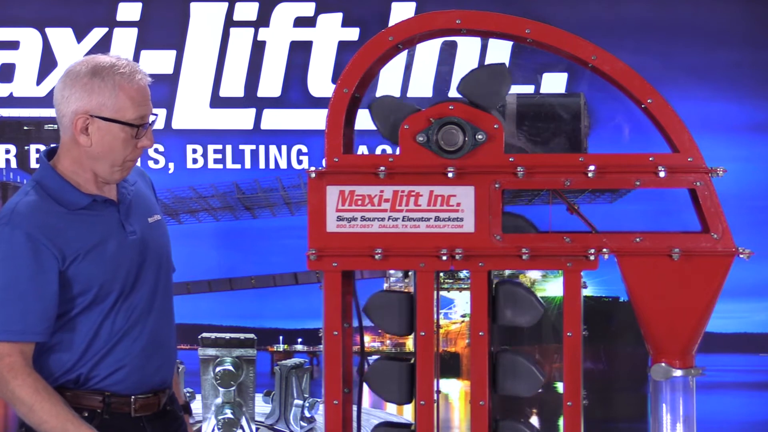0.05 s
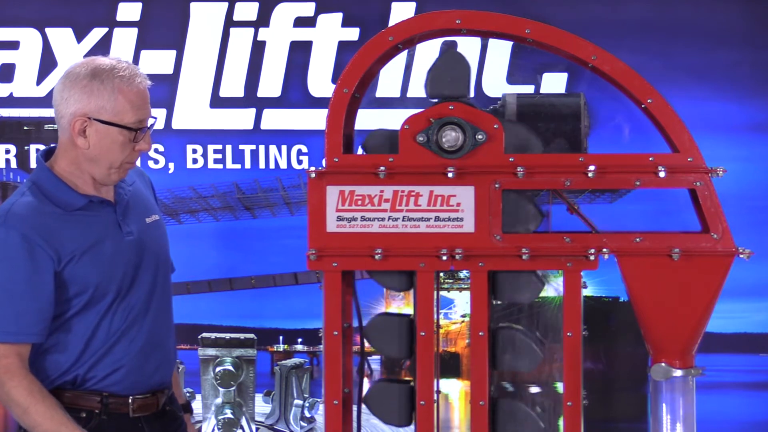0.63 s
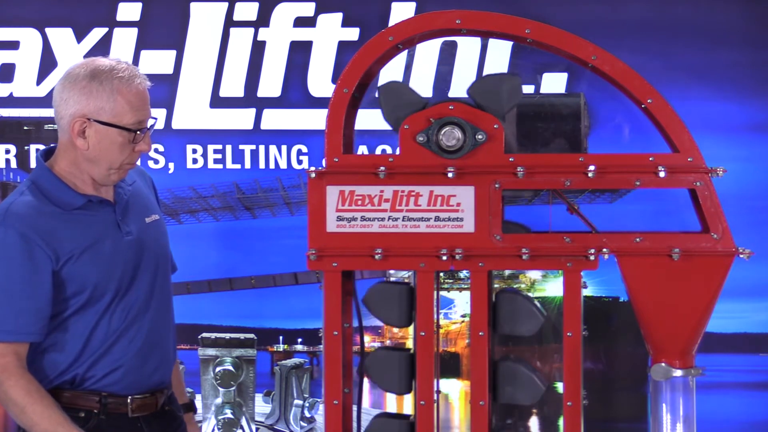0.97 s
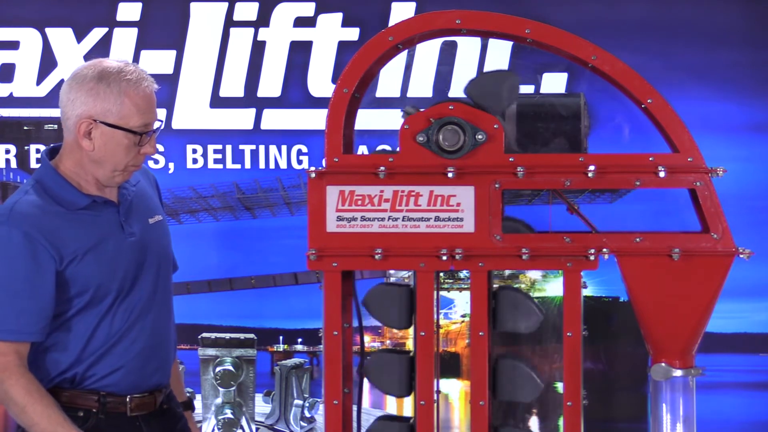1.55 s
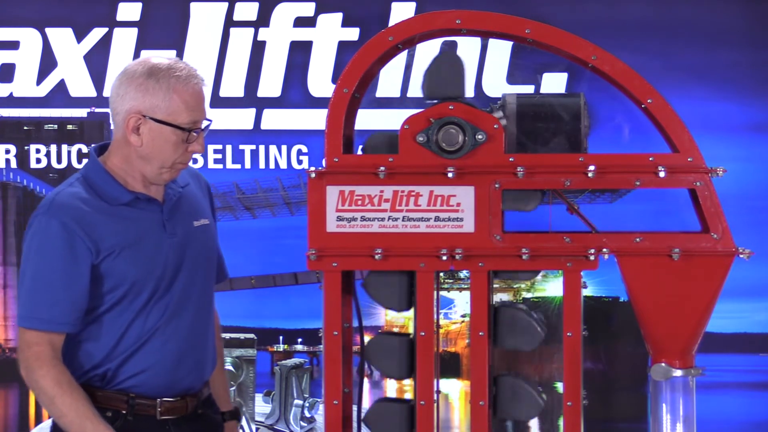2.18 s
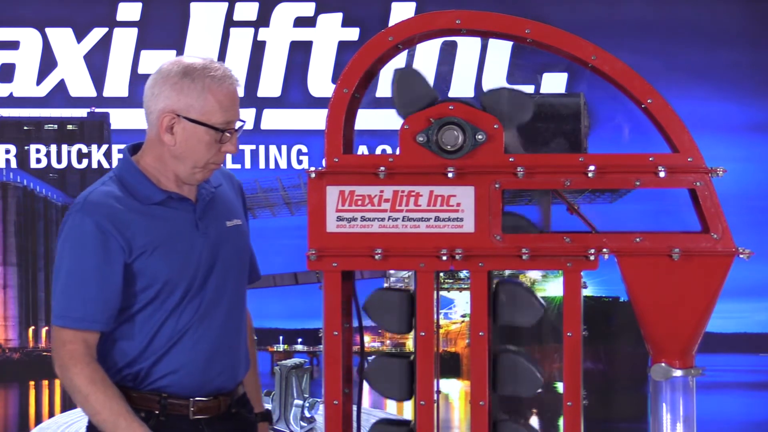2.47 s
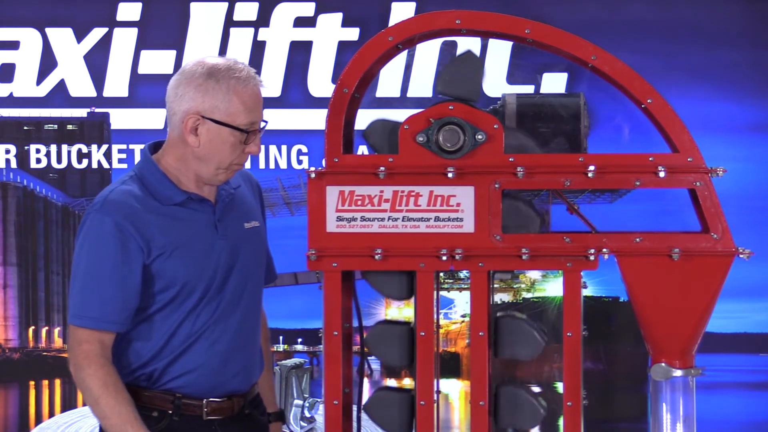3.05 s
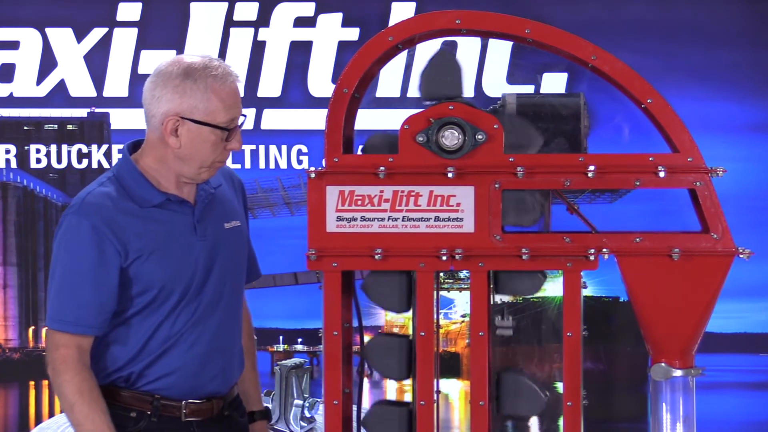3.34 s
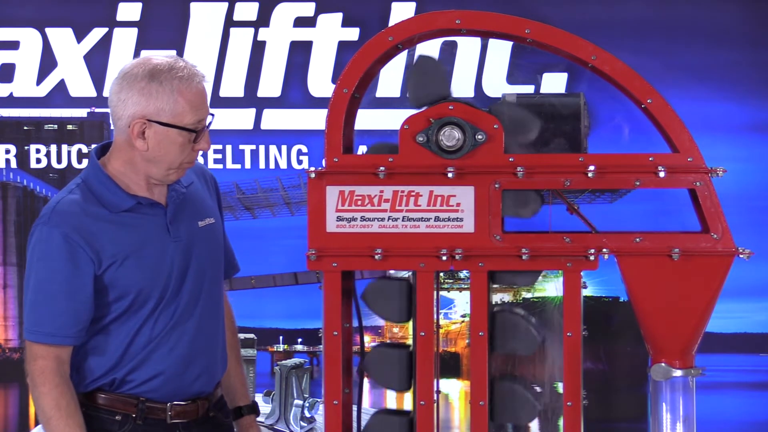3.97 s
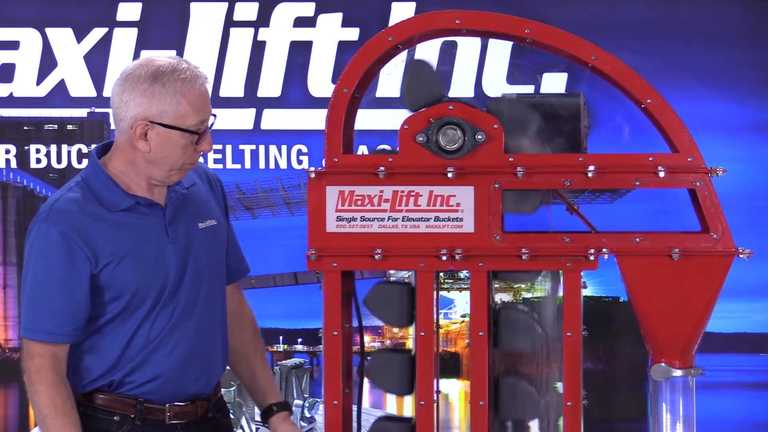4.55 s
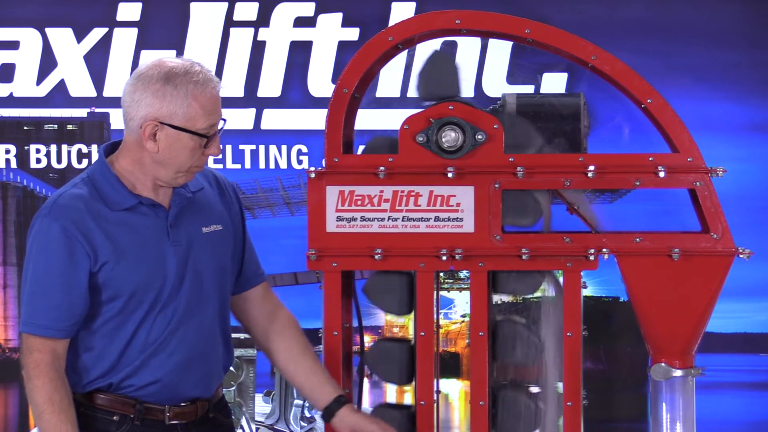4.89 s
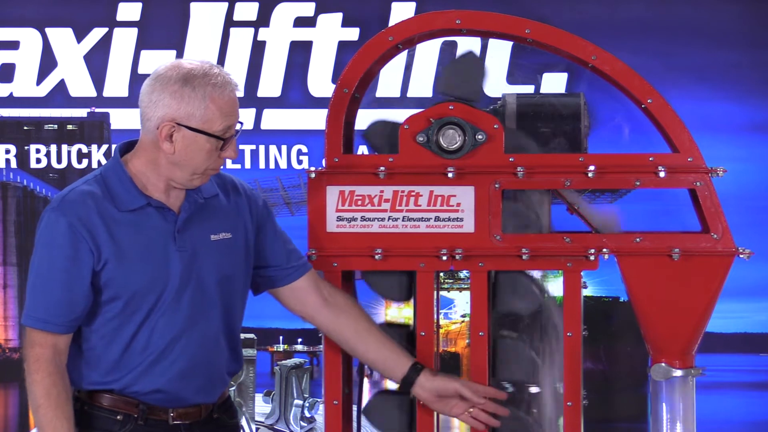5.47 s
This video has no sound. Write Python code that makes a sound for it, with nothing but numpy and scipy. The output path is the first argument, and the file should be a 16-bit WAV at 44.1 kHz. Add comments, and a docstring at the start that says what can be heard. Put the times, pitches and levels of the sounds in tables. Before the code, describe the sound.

Hard granules hiss and patter through a small bucket elevator as it takes up its load. The flow swells quickly, then comes in uneven surges, countless tiny ticks changing tone as they land on the casing and spouts. Buckets knock and clack lightly against the steel, mostly midway, over a faint drive rumble and hum. The stream grows louder and brighter at the end. It sounds close, with little echo.

```python
"""Hard granules hiss and patter in surges through a small bucket elevator as it takes up its load.
Countless tiny ticks land on the casing and spouts, each landing place with its own colour, and a lone
grain snaps out now and then. The steel casing drums and drones with the flow, and buckets clack and
knock against it. Underneath, the drive rumbles and a panel hums where the belt rubs it."""
import sys
import numpy as np
from scipy import signal
from scipy.fft import rfft, irfft
from scipy.io import wavfile
from scipy.ndimage import uniform_filter1d

SR = 44100
rng = np.random.default_rng(int(sys.argv[2]) if len(sys.argv) > 2 else 0)


def materialize(psi):
    """Save the field psi as 16-bit PCM at rate SR to the path in sys.argv[1].

    A 1-D psi becomes a single channel; in a 2-D psi each row is a channel.
    """
    bounded = np.clip(np.atleast_2d(psi).T, -1, 1)
    quanta = np.round(bounded * 32767).astype(np.int16)
    wavfile.write(sys.argv[1], SR, quanta)


N = 247842
TIME, FREQ = np.arange(N) / SR, np.fft.rfftfreq(N, 1 / SR)

# EQ of the drive rumble: (frequency [Hz], gain [dB])
DRIVE_EQ = [(15, -59), (25, -41), (37, -19.5), (87, -4.5), (113, -8.5), (124, -11), (139, -10), (161, -4.5),
            (192, -10.5), (205, -6), (345, -19), (426, -17), (1200, -30), (1560, -63), (2640, -120)]
# notes of the rubbed panel: (start [s], end [s], pitch [Hz], level [dB])
PANEL_HUMS = [(1.362, 2.164, 174.6, -65), (3.3, 3.724, 239.7, -68.5), (4.4, 5.0, 240.6, -64.5),
              (4.753, 5.206, 122, -67)]
# casing resonances: (frequency [Hz], t60 [s], gain when rubbed [dB], gain when knocked [dB])
CASING_MODES = [(111, 0.17, -6.5, -2), (152, 0.18, -10, 0), (177, 0.25, -6, 3.5), (239, 0.3, -8, -3),
                (271.4, 0.18, -9, 0.5), (299, 0.25, -5.5, -1), (335.8, 0.23, -0.5, -2),
                (354.6, 0.51, -2.5, -6.5), (437, 0.062, -5.5, -10), (497, 0.23, -6.5, -4),
                (521, 0.29, -10.5, 0), (556, 0.13, -30, -7), (692, 0.029, -3.5, -13), (1158, 0.19, -9, -34)]
# EQ of the sheet steel: (frequency [Hz], gain [dB])
SHEET_EQ = [(200, -24), (450, -3), (700, -2), (1000, -2), (1100, 0), (1165, 1.5), (1240, -4.5), (1450, -4),
            (2000, -6.5), (3500, -19.5)]
# bucket lips catching the sheet: (time [s], level [dB])
LIP_CLACKS = [(.745, -52), (.915, -52), (2.33, -53), (2.59, -51.5), (2.74, -56), (2.83, -57), (3.862, -54),
              (4.362, -55)]
# buckets hitting the casing: (time [s], level [dB], ring centre [Hz], attack [s], other modes [dB])
BUCKET_KNOCKS = [(.94, -59.5, 510, 0.0099, -4), (1.07, -56.5, 350, 0.0089, -16),
                 (1.7, -60, 150, 0.0087, -21), (2.4, -58, 345, 0.021, -12), (2.586, -52, 600, 0.0032, -14),
                 (2.73, -49.5, 150, 0.0084, -12), (2.758, -52, 285, 0.0045, -12),
                 (2.824, -46, 525, 0.0069, -5), (2.857, -54, 500, 0.0052, -6.5),
                 (3.0, -57, 344, 0.038, -16), (3.135, -57, 148, .01, -11), (3.2, -62, 340, 0.014, -18),
                 (3.885, -52.5, 340, 0.016, -10), (4.465, -52.5, 277, 0.026, -13)]
# bed of grain, building as the buckets fill: (time [s], level [dB], relative sparkle [dB])
STREAM_BED = [(0, -66, -2), (.08, -59.5, -5), (.4, -54, -5.5), (1.3, -42, 2), (2.2, -43, 6.5),
              (2.65, -45.5, 2), (3.35, -46.5, -3), (3.7, -45.5, -0.5), (4.72, -41, -2), (5.05, -35, 5.5),
              (5.62, -34.3, 5.5)]
# loads spilling on top: (peak time [s], level [dB], rise [s], fall [s], relative sparkle [dB])
GRAIN_SURGES = [(.575, -34, 0.062, 0.15, 2), (.86, -28, 0.18, 0.22, 2), (1.3, -41.5, .04, 0.036, 2.5),
                (1.48, -42, 0.085, 0.11, 1.5), (1.75, -38.5, 0.19, 0.19, 4), (2.1, -43, 0.076, 0.087, 0),
                (2.35, -37.3, 0.095, .14, 4.5), (2.79, -45, 0.086, 0.054, 5),
                (2.98, -40.5, 0.09, 0.16, 7.5), (3.021, -30, 0.04, 0.076, -2.5),
                (4.0, -43, 0.14, 0.078, 0.5), (4.28, -45, 0.13, .1, -1), (4.85, -40, 0.056, 0.075, 6.5),
                (5.13, -34, .06, 0.067, 10), (5.4, -40, 0.13, 0.063, 14)]
# narrow rings of the spout tube: (frequency [Hz], relative strength [dB])
TUBE_RINGS = [(4276, -16), (4618, 4), (4979, 3), (5329, -15), (5782, -22), (6234, -15), (6590, 6)]
# colour of each place where the grains land: (frequency [Hz], gain [dB])
TRICKLE_EQ = [(880, -46.5), (1500, -13), (2670, -14.5), (3210, -8), (3310, -3), (3760, -3.5), (4060, -8),
              (4660, -7), (5950, -6.5), (9230, -4.5), (15500, -17)]
ONRUSH_EQ = [(1400, -34), (1530, -15), (1680, -9), (1950, -15.5), (2250, -9), (2650, -14), (2980, -8),
             (3500, -11.5), (3900, -2.5), (4700, -0.5), (5500, -9), (8500, -4.5), (10900, -0.5),
             (15500, -8)]
HOPPER_EQ = [(820, -46), (1400, -25), (1730, -11.5), (2030, -14), (2250, -10), (2920, -8.5), (3230, -9),
             (4870, -2.5), (7360, -3.5), (9960, -1), (13300, -4), (14600, -1), (15500, -7.5)]
SPOUT_EQ = [(1100, -29), (1800, -18), (2300, -14), (3600, -12), (3900, -4), (4600, -5.5), (5400, -6),
            (7400, -5), (8200, -2), (9300, -3.5), (9900, 0), (11500, -1), (15500, -6.5)]
ELBOW_EQ = [(1100, -16.5), (2000, -18.5), (2800, -13), (3110, -12), (3400, -12.5), (3890, -8),
            (5240, -10.5), (7800, -5.5), (9320, -5), (10100, 0.5), (15500, -9)]
CHUTE_EQ = [(880, -42), (1500, -18), (2200, -19), (2350, -21), (2620, -7.5), (2940, -8.5), (3180, -9),
            (4230, -3.5), (5500, -8.5), (6250, -6), (9230, -3.5), (10200, 0), (15500, -10)]
LEG_EQ = [(1160, -12.5), (1400, -15.5), (1680, -8.5), (2250, -10.5), (2770, -3.5), (3070, -4.5),
          (3640, -2.5), (6790, -0.5), (10500, 1.5), (15500, -6.5)]
HOOD_EQ = [(820, -41), (1400, -18.5), (2010, -15), (2220, -13), (2480, -13.5), (2950, -9.5), (3230, -10),
           (3910, -7), (9000, -4.5), (10200, -3.5), (11700, -4), (12700, -2.5), (15500, -4)]
LANDING_EQS = [TRICKLE_EQ, ONRUSH_EQ, HOPPER_EQ, SPOUT_EQ, ELBOW_EQ, CHUTE_EQ, LEG_EQ, HOOD_EQ]
# crossfades from one landing place to the next: (midpoint [s], length [s])
LANDING_FADES = [(.475, 0.14), (.7, 0.26), (1.17, 0.29), (2.38, .3), (2.96, 0.069), (3.15, 0.16),
                 (4.88, 0.17)]


def undb(db):
    """Decibels to gain."""
    return 10 ** (np.asarray(db) / 20)


def unit(x):
    """Scale to rms 1."""
    return x / np.sqrt(np.mean(x ** 2))


def pan(db):
    """Stereo gains for a left-minus-right level; negative leans right."""
    return undb(np.array([[.5], [-.5]]) * db)


def eq_curve(points):
    """Gain at every frequency from (Hz, dB) points, rolling off below the first."""
    hz, db = np.transpose(points)
    return undb(np.interp(np.log(FREQ + 1), np.log(hz), db)) * np.minimum(FREQ / hz[0], 1) ** 2


def shape(x, gain):
    """Filter by a gain at every frequency."""
    return irfft(rfft(x) * gain, N)


def wobble(rate_hz):
    """Smooth random modulator: sample-and-hold, slewed twice; rms 1."""
    hold = int(SR / rate_hz)
    steps = np.repeat(rng.standard_normal(N // hold + 1), hold)
    return unit(uniform_filter1d(uniform_filter1d(steps, hold), hold)[:N])


def stereo_noise(correlation):
    """White noise, partly shared between left and right."""
    centre = np.sqrt(correlation) * rng.standard_normal(N)
    return centre + np.sqrt(1 - correlation) * rng.standard_normal((2, N))


def room(x, t60, wet_db):
    """Direct sound plus a diffuse stereo tail."""
    t = TIME[:SR // 2]
    tail = rng.standard_normal((2, len(t))) * undb(-60 * t / t60)
    tail *= undb(wet_db) / np.sqrt(np.sum(tail ** 2) / 2)
    return (x + signal.fftconvolve(x, tail, axes=1)[:, :N]) / np.sqrt(1 + undb(wet_db) ** 2)


def impacts(per_s, spread_db, clump_db):
    """Dense grain ticks of unequal size, bunched by a fast level wobble; rms 1."""
    chance = np.clip(per_s / SR, .001, 1)
    hit = rng.random((2, N)) < chance
    size = rng.standard_normal((2, N)) * undb(spread_db * rng.standard_normal((2, N)))
    return unit(hit * size / np.sqrt(chance) * undb(clump_db * wobble(600)))


def drive_rumble(level_db):
    """Motor and belt lay down an even, low rumble."""
    return unit(shape(stereo_noise(0.15), eq_curve(DRIVE_EQ))) * undb(level_db) * pan(-8)


def panel_hum():
    """A panel sings on a slightly wavering note while the belt rubs it."""
    out = 0
    for start, end, hz, db in PANEL_HUMS:
        swell = np.clip(np.minimum(TIME - start, end - TIME) / 0.19, 0, 1)
        phase = 2 * np.pi * np.cumsum(hz * (1 + 0.0117 * wobble(21.98))) / SR
        out = out + swell * unit(np.sin(phase)) * undb(db + 0.65 * wobble(15))
    return out * pan(-11)


def casing_drone(load_db):
    """The belt keeps the casing modes droning, louder with the flow and as the machine fills."""
    level_db = -65 + 0.23 * load_db + 1.98 * TIME
    mode_power = sum(undb(db) ** 2 * t60 / (1 + (2 * np.pi * (FREQ - hz) * t60 / np.log(1000)) ** 2)
                     for hz, t60, db, _ in CASING_MODES)
    low_cut = np.minimum(FREQ / 100, 1) ** 2
    drone = unit(shape(stereo_noise(0.071), np.sqrt(mode_power) * low_cut))
    return drone * undb(level_db) * pan(-4)


def sheet_drumming(load_db, clack_decay_s):
    """Grains drum on the sheet steel, building with flow and fill; bucket lips clack in short bursts."""
    level_db = -63.5 + 0.6 * load_db + 1.76 * TIME
    clacks = sum(undb(db) * (TIME > s) * np.exp(-np.abs(TIME - s) / clack_decay_s)
                 for s, db in LIP_CLACKS)
    drum = unit(shape(impacts(per_s=6000, spread_db=1.5, clump_db=0), eq_curve(SHEET_EQ)))
    return drum * np.hypot(undb(level_db), clacks) * pan(-3)


def bucket_knocks(reach_octaves, rattle):
    """A plastic bucket pushes into the casing; where it strikes decides which modes answer."""
    out, t = np.zeros((2, N + SR)), TIME[:SR // 2]
    hz, t60, _, mode_db = np.transpose(CASING_MODES)[:, :, None]
    for s, level_db, centre_hz, attack_s, others_db in BUCKET_KNOCKS:
        nearness = np.exp(-(np.log2(hz / centre_hz) / reach_octaves) ** 2)
        weight = undb(mode_db) * np.maximum(undb(others_db), nearness)
        phase = rng.random((2, len(hz), 1)) * 0.52  # each mode takes its own path to left and right
        envelope = (1 - np.exp(-t / attack_s)) * undb(-60 * t / t60)
        ring = np.sum(weight * envelope * np.sin(2 * np.pi * (hz * t + phase)), axis=1)
        knock = ring * (1 + rattle * wobble(140)[:len(t)])
        start = int(s * SR)
        out[:, start:start + len(t)] += knock / np.std(knock[:, :SR // 20]) * undb(level_db)
    return room(out[:, :N], t60=.2, wet_db=-14) * pan(-6)


def stray_grains(flow_db, per_s, boost_db, spread_db):
    """Now and then a lone grain bounces off the near wall with a sharper tick."""
    hits = (rng.random(N) < per_s / SR) * undb(boost_db + spread_db * rng.uniform(-1, 1, N))
    t = TIME[:SR // 100]
    snap = rng.standard_normal((2, len(t))) * np.exp(-t / 0.00073)
    ticks = signal.fftconvolve((hits * undb(flow_db))[None], snap, axes=1)[:, :N]
    return shape(ticks, eq_curve([(2500, -12), (5000, 4), (10000, 0), (16000, -3)]))


def grain_flow():
    """Level and relative sparkle of the stream in dB: bell-shaped surges add their power to the bed."""
    times, *columns = np.transpose(STREAM_BED)
    bed_db, bed_sparkle_db = [np.interp(TIME, times, column) for column in columns]
    power, sparkle_power = undb(bed_db) ** 2, undb(bed_db + bed_sparkle_db) ** 2
    for s, level_db, rise_s, fall_s, sparkle_db in GRAIN_SURGES:
        width_s = np.where(TIME < s, rise_s, fall_s)
        surge = undb(level_db) ** 2 * np.exp(-((TIME - s) / width_s) ** 2)
        power += surge
        sparkle_power += surge * undb(sparkle_db) ** 2
    return 10 * np.log10(power), 10 * np.log10(sparkle_power / power)


def patter(flow_db, flutter_db, wet_db):
    """One size of grain ticking inside the casing; a heavier flow is denser."""
    ticks = impacts(per_s=20000 * undb(.25 * (flow_db + 40)), spread_db=1.4, clump_db=0.45)
    return room(ticks * undb(flutter_db + 0.5 * wobble(30.15)), t60=0.11, wet_db=wet_db)


def grain_stream(flow_db, sparkle_db):
    """The stream ticks on one surface after another: the lower ticks echo in the casing, the bright top
    sparkles drier."""
    flutter_db = 0.4 * wobble(40)
    echoing = patter(flow_db, flutter_db, wet_db=-2)
    damped = patter(flow_db, flutter_db, wet_db=-12.5)
    dry_ticks = patter(flow_db, flutter_db, wet_db=-20)
    lows = 1 / (1 + (FREQ / 4200) ** 4)  # crossover from the echoing ticks to the drier ones
    highs = np.clip((FREQ - 9200) / 500, 0, 1)  # crossover from body to sparkle
    rattle = shape(echoing, np.sqrt(lows)) + shape(damped, np.sqrt(1 - lows))
    tube = 1 + sum(.5 * undb(db) / (1 + ((FREQ - hz) / 12) ** 2) for hz, db in TUBE_RINGS)
    reached = [1] + [np.clip((TIME - s) / length + .5, 0, 1) for s, length in LANDING_FADES] + [0]
    body = sparkle = 0
    for k, landing_eq in enumerate(LANDING_EQS):
        fader = np.clip(reached[k] - reached[k + 1], 0, 1)
        colour = eq_curve(landing_eq) * tube
        body = body + fader * unit(shape(rattle, colour * (1 - highs)))
        sparkle = sparkle + fader * unit(shape(damped + dry_ticks, colour * highs))
    # faster grains make shorter contacts and tick more brightly
    return (body + undb(sparkle_db) * sparkle) * undb(flow_db) * pan(-2)


def scene():
    """Grains up front, the machine beneath; one flow rides both the grains and the casing."""
    flow_db, sparkle_db = grain_flow()
    load_db = flow_db + 40  # relative to the usual flow of -40 dB
    grains = grain_stream(flow_db, sparkle_db) + stray_grains(flow_db, per_s=7, boost_db=13, spread_db=1)
    casing = sheet_drumming(load_db, clack_decay_s=0.026) + casing_drone(load_db)
    machine = panel_hum() + bucket_knocks(reach_octaves=0.18, rattle=0.23) + drive_rumble(level_db=-63)
    return grains + casing + machine


def record(dry):
    """A steep low-pass trims the air off the top of the mix."""
    return signal.sosfiltfilt(signal.ellip(10, .05, 60, 15780, fs=SR, output="sos"), dry)


dry = scene()
out = record(dry)
materialize(out)
```